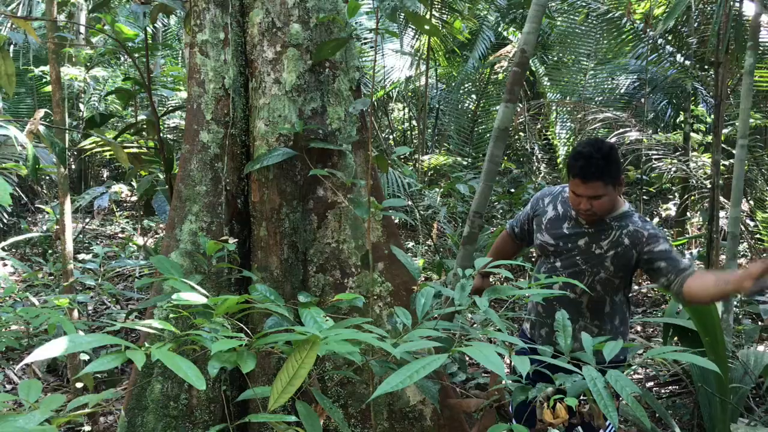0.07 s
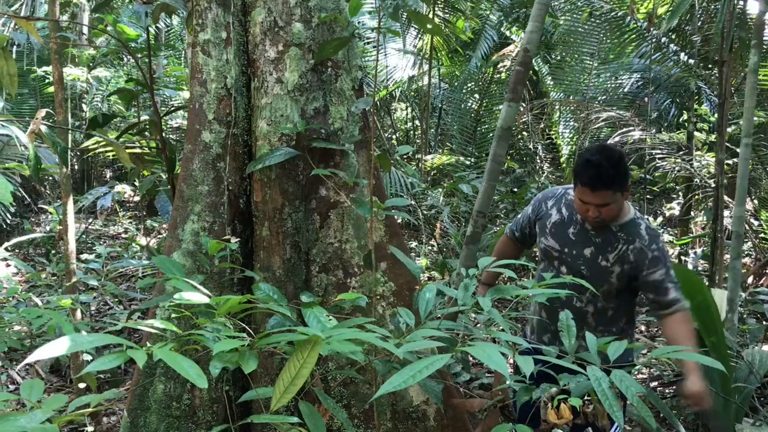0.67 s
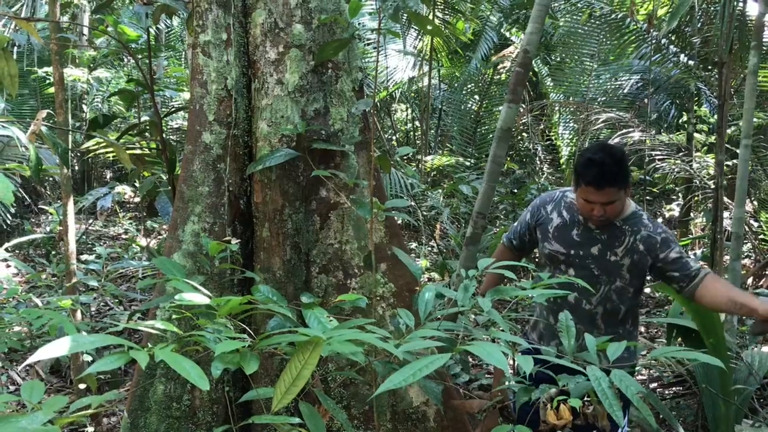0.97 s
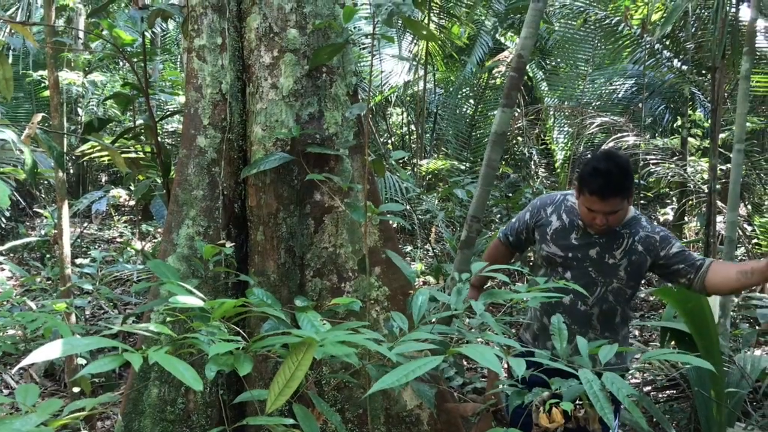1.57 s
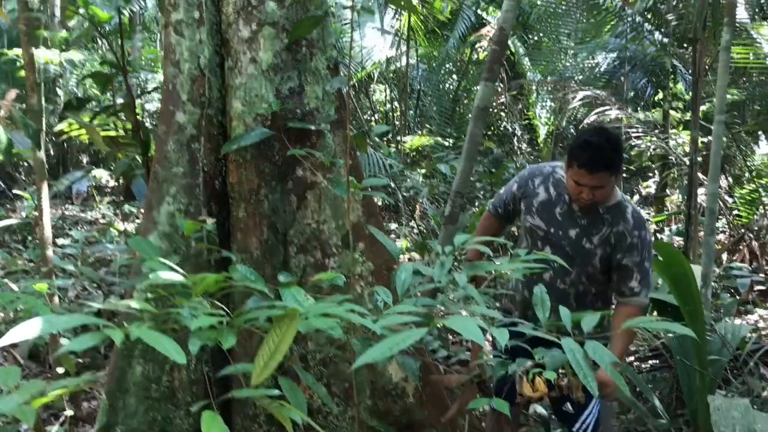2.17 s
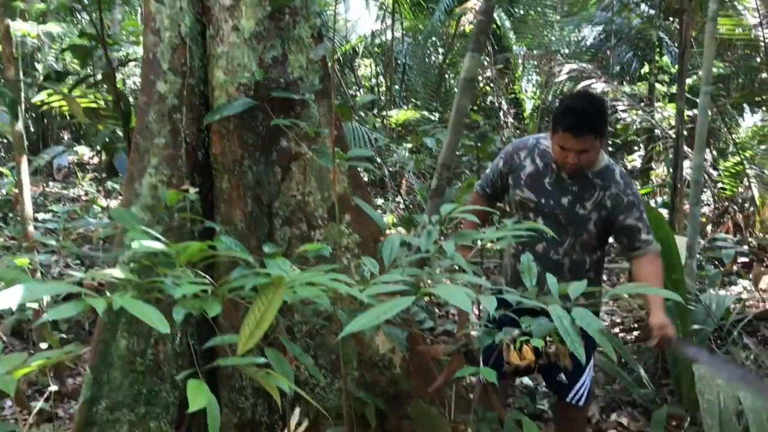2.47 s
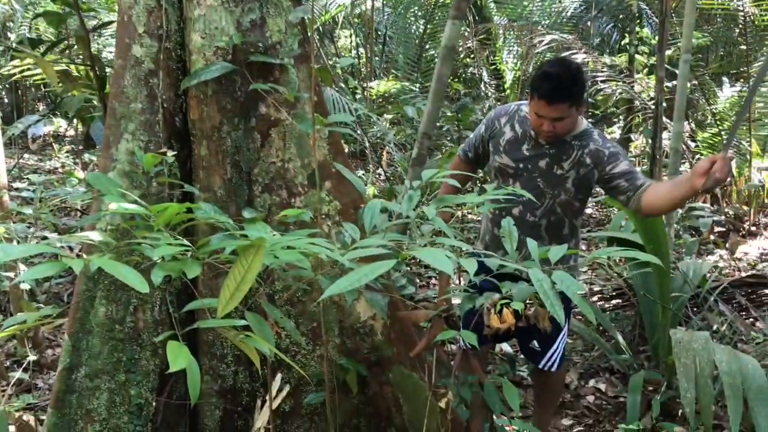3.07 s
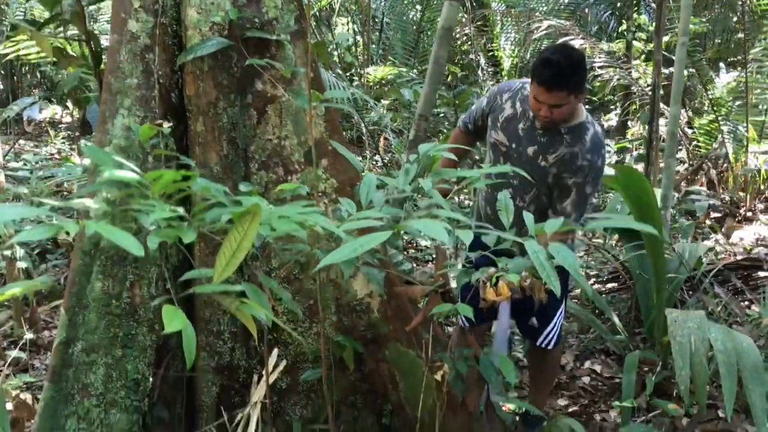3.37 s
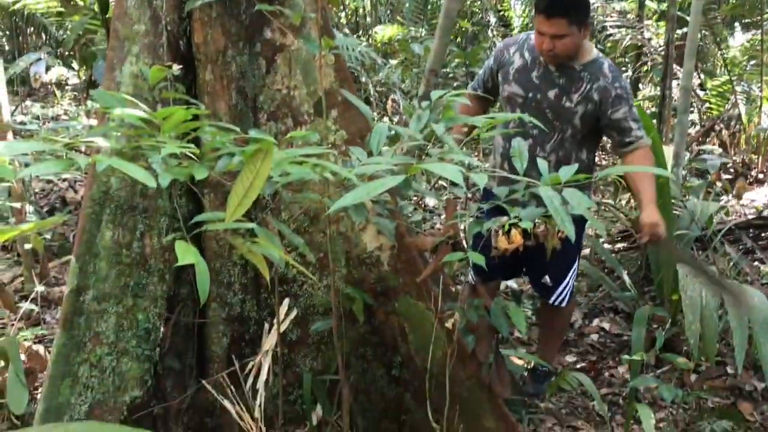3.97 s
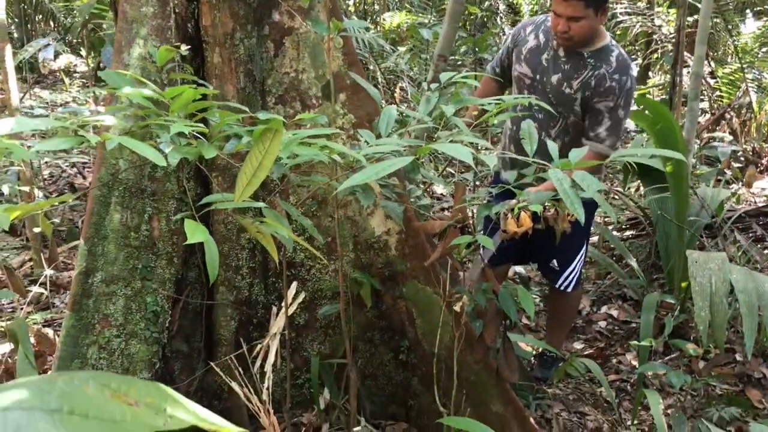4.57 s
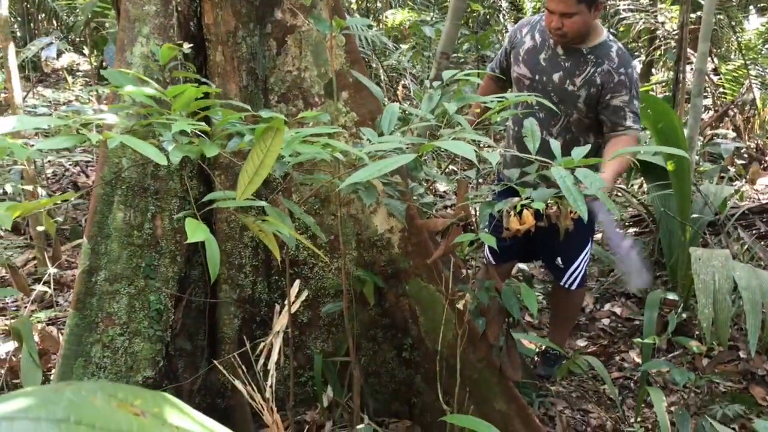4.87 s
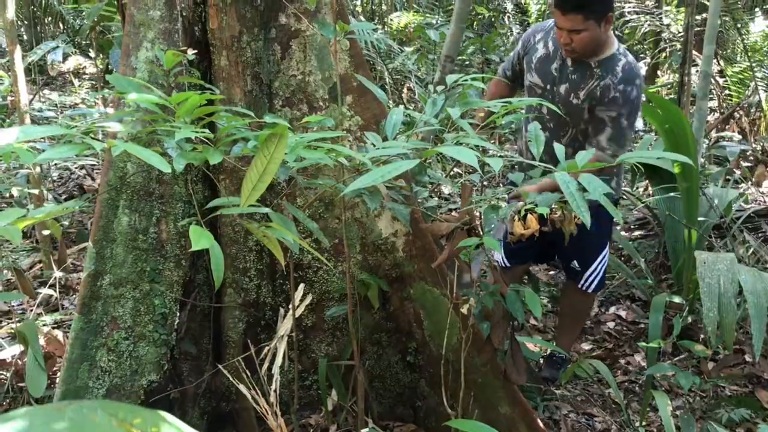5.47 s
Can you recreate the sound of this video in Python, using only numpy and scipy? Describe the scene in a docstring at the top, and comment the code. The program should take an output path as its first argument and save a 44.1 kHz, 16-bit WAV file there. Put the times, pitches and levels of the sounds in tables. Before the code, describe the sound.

Five loud machete chops on wood crack and echo through a forest, while crickets sing thinly in the background.

```python
"""A machete strikes the tall, flat root of a big rainforest tree five times.
The root booms like a plank, the bark cracks, the steel blade rings on as it swings back,
and the forest returns a long echo. Crickets and other insects sing, dry leaves tick, the air hums.
A limiter flattens each blow, and the volume dips briefly after it."""
import sys
import numpy as np
from scipy import signal
from scipy.fft import rfft, irfft
from scipy.io import wavfile
from scipy.ndimage import uniform_filter1d, minimum_filter1d

SR = 44100
rng = np.random.default_rng(int(sys.argv[2]) if len(sys.argv) > 2 else 0)


def wav_record(signal):
    """Record a signal, one row per channel, as 16-bit PCM in the file named by sys.argv[1]."""
    frames = np.transpose(np.atleast_2d(signal))
    bounded = np.clip(frames, -1, 1)
    # unit amplitude maps onto the largest positive 16-bit level
    quanta = np.round(bounded * 32767).astype(np.int16)
    wavfile.write(sys.argv[1], SR, quanta)


N = 242550
TIME = np.arange(N) / SR


# The blows: start_s, boom_db, root_spot (0 to 1), crack_db, brightness_db_per_octave, ring_db,
# blade_point (share of its length), looseness (a loose grip rings longer), swell_db
BLOWS = [(0.3954, -0.5, 0.05, 1, 1, -32.5, 0.32, 1.09, -27.5),
         (2.0314, 0, 0.1, -0.5, 2.5, -25.5, .445, 0.83, -35),
         (3.4105, -2, 0.2, 0.5, 0.5, -31, 0.24, 0.69, -27.5),
         (4.5906, -0.5, 0.76, 4.5, -0.5, -30.5, 0.066, 0.89, -43.5),
         (5.463, 0, 0.86, 5, -1.5, -33, .06, 1, -42.5)]
# Soft second thuds of the root: start_s, level_db
REBOUNDS = [(2.105, -28), (4.665, -25.5)]

def machete_blows(rebound_spot=0.6):
    """Each blow sounds the root, the bark, the blade and the forest."""
    out = np.zeros(N)
    for start_s, db, spot, crack_db, brightness, ring_db, point, looseness, swell_db in BLOWS:
        swell = low_swell()
        add(out, start_s - len(swell) / SR, amp(swell_db) * swell)
        add(out, start_s, amp(db + 1) * root_boom(spot))
        add(out, start_s, amp(db) * root_thump())
        add(out, start_s, amp(crack_db) * bark_crack(brightness))
        add(out, start_s, amp(ring_db) * blade_ring(point, looseness))
        add(out, start_s, amp(ring_db) * blade_clang())
        add(out, start_s, amp(db) * forest_echo())
    for start_s, db in REBOUNDS:
        add(out, start_s, amp(db) * root_boom(rebound_spot))
    return out


# The tones of the bending root: pitch_hz, level_at_spot_0_db, level_at_spot_1_db, decay_s
# (a decay is the time a sound takes to fall by 60 dB)
ROOT_TONES = [(113, 0, -2, 0.1), (151.1, -1, -0.5, 0.091), (180.6, -8, -8.5, 0.15),
              (221.6, -6.5, -1, 0.085), (256, -9, -1, 0.097), (330, -6.5, -9, 0.069),
              (348.6, -45.5, -18.5, 0.031), (379.6, -11.5, -15, 0.1), (437, -8.5, -5, 0.047),
              (509.6, 4, 0, 0.039), (538.6, 2, -1.5, 0.042), (638.5, -16, -14, 0.075),
              (821, -22, -29, 0.14), (897, -27, -40, 0.18), (960, -12.5, -11, 0.033),
              (1164, -18.5, -16.5, .055), (1364, -29, -14, 0.0091), (1530, -24, -16, 0.066),
              (1877, -33, -20, 0.038), (2556, -42.5, -7, 0.015), (2616, -16.5, -28.5, 0.041),
              (3040, -74.5, -17.5, 0.058)]

def root_boom(spot, lag_s=0.00554, corner_hz=260):
    """The root bends and rings; its low waves travel slowly and so arrive last."""
    t = TIME[:SR // 2]
    ring = np.zeros(len(t))
    for k, (hz, db0, db1, decay_s) in enumerate(ROOT_TONES):
        level = amp(db0 + spot * (db1 - db0) - 60 * t / decay_s)
        ring += (-1) ** k * level * np.sin(2 * np.pi * hz * t)  # every other tone is flipped
    hz = np.fft.rfftfreq(SR, 1 / SR)
    delay_lows = np.exp(-2j * np.pi * lag_s * corner_hz * np.arctan(hz / corner_hz))
    return irfft(rfft(ring, SR) * delay_lows, SR)[:len(t)]


def root_thump(db=-14, hz=72, decay_s=0.1, rise_s=0.0067):
    """The whole root heaves slowly under the blow."""
    t = TIME[:SR // 3]
    rise = 1 - np.exp(-(t / rise_s) ** 2)
    return amp(db - 60 * t / decay_s) * rise * np.sin(2 * np.pi * hz * t)


# The tone colour of cracking bark: pitch_hz, level_db
CRACK_COLOUR = [(200, -34), (700, -5.5), (1500, 8), (3300, -1), (5500, -4.5), (8500, -6), (12000, -12),
                (15500, -32)]

def bark_crack(brightness, click_hz=5700, click_s=0.0023, snap_s=0.0045, crush_s=0.042):
    """The edge clicks on contact, snaps the bark and briefly crushes it."""
    t = TIME[:SR // 8]
    colour = [(hz, db + brightness * np.log2(hz)) for hz, db in CRACK_COLOUR]
    click = amp(1 + 2 * brightness - 60 * t / click_s) * np.sin(2 * np.pi * click_hz * t)
    snap = amp(-5 - 60 * t / snap_s)
    crush = amp(-16 - 60 * t / crush_s)
    return click + noise(colour, len(t)) * (snap + crush)


# The blade's overtones, from the seventh up: pitch_hz, level_db, decay_s
BLADE_TONES = [(4200, 0, .8), (4828, -4, .72), (5412, -3, .66), (5955, -2, .62), (6498, -5, .54),
               (7036, -16, .45), (7562, -18, .38)]

def blade_ring(point, looseness, shimmer=0.42, shimmer_hz=50, rise_s=0.0036):
    """The steel rings as it leaves the wood; tones that barely move the struck point stay quiet."""
    t = TIME[:SR]
    pitch_bend = 0.006 * t / 0.14 * np.exp(1 - t / 0.14)  # from the backswing
    clock = np.cumsum(1 + pitch_bend) / SR
    out = np.zeros(SR)
    for n, (hz, db, decay_s) in enumerate(BLADE_TONES, 7):
        strength = np.sqrt(np.cos(np.pi * n * point) ** 2 + 0.018)
        level = strength * amp(db - 60 * t / (decay_s * looseness))
        reflections = shimmer * (drift(shimmer_hz, SR) + 1j * drift(shimmer_hz, SR))
        out += level * ((1 + reflections) * np.exp(2j * np.pi * hz * clock)).imag
    return out * (1 - np.exp(-t / rise_s))


# The blade's crowded, short-lived tones: pitch_hz, level_db
CLANG_COLOUR = [(1500, -22.5), (3500, -5), (4800, -1.5), (6300, -4.5), (8000, -8.5), (12000, -17.5),
                (15500, -22)]
# How long they last: pitch_hz, decay_s
CLANG_DECAY = [(4000, 0.12), (7000, 0.15), (14000, 0.15)]

def blade_clang(db=10, rise_s=0.012):
    """The steel rattles briefly while the blade bites."""
    t = TIME[:SR // 3]
    rise = 1 - np.exp(-(t / rise_s) ** 2)
    return amp(db) * rise * dying_noise(CLANG_COLOUR, CLANG_DECAY, len(t))


# Clicks ahead of the blows: start_s, level_db, decay_s
EARLY_CLICKS = [(.3846, -8, 0.0065), (.3865, -20.5, 0.07), (.3925, -18, 0.014), (2.0085, -43, .012),
                (2.021, -30, 0.007), (2.0295, -30, 0.01)]
# Their tone colour: pitch_hz, level_db
CLICK_COLOUR = [(200, -25.5), (800, 1.5), (2500, 2), (5500, 6), (9000, 1.5), (15500, -4.5)]

def early_clicks():
    """Faint clicks and scratches come just before the first two blows."""
    return scratches(EARLY_CLICKS, CLICK_COLOUR)


def low_swell(band_hz=(290, 510), length_s=0.022):
    """A faint, low rush swells just before each blow."""
    size = round(length_s * SR)
    band = signal.butter(2, band_hz, "bandpass", fs=SR, output="sos")
    rush = unit(signal.sosfilt(band, rng.standard_normal(SR // 4))[-size:])
    return rush * np.linspace(0, 1, size) * signal.windows.tukey(size, 0.15)


# The tone colours of the near and far echoes: pitch_hz, level_db
NEAR_COLOUR = [(100, -10), (400, -1.5), (1000, 10), (2000, 7), (3400, 3.5), (5500, -20.5), (7500, -7.5),
               (10000, -10), (12000, -6.5), (15500, -32.5)]
FAR_COLOUR = [(50, -14), (140, 11.5), (280, 1), (500, 3.5), (1000, -1), (1800, -6), (3500, -1.5),
              (7000, -4), (15000, -35)]
# How long they last: pitch_hz, decay_s
NEAR_DECAY = [(200, 0.28), (1000, 0.3), (5000, 0.19), (14000, 0.32)]
FAR_DECAY = [(140, 0.99), (500, 1.64), (1200, 1.48), (3500, 0.66), (10000, 0.59)]

def forest_echo(near_db=-25, near_delay_s=0.0038, far_db=-37.5, far_rise_s=0.014, trunk_s=0.2395):
    """Ground and leaves scatter the blow at once; far trunks keep returning it, one of them louder."""
    t = TIME[:2 * SR]
    near_level = amp(near_db) / (1 + np.exp((near_delay_s - t) / 0.0028))
    near = near_level * dying_noise(NEAR_COLOUR, NEAR_DECAY, len(t))
    trunk_db = 5 * np.exp(-((t - trunk_s) / 0.019) ** 2)
    far_level = amp(far_db + trunk_db) * (1 - np.exp(-t / far_rise_s))
    return near + far_level * dying_noise(FAR_COLOUR, FAR_DECAY, len(t))


# The nearest cricket's calls: peak_s, level_db
CRICKET_CALLS = [(.17, -50), (0.661, -57), (1.272, -41.5), (1.85, -44), (2.48, -49.5), (3.07, -44),
                 (3.68, -68), (4.208, -43.5), (4.799, -47.5), (5.29, -46)]
# The crickets' voice: pitch_hz, width_hz, level_db
CRICKET_VOICE = [(2975, 49, -5), (3065, 15, -9.5)]

def crickets(rise_s=0.056, decay_s=1, chorus_db=-55):
    """One cricket's calls swell and die away among the trees, over a steady chorus of its kind."""
    power = amp(chorus_db) ** 2
    for peak_s, db in CRICKET_CALLS:
        swell = np.exp(-(np.minimum(TIME - peak_s, 0) / rise_s) ** 2)
        fade = amp(db - 60 * np.maximum(TIME - peak_s, 0) / decay_s)
        power += (swell * fade) ** 2
    return np.sqrt(power) * sum(amp(db) * buzz(hz, width) for hz, width, db in CRICKET_VOICE)


# The voices of distant insects: pitch_hz, width_hz, level_db
DRONE_VOICES = [(2860, 168, -60), (3096, 560, -59), (3397, 130, -67), (5830, 540, -68), (8810, 940, -70.5),
                (2350, 690, -65.5)]

def insect_drone(start_db=-2, growth_db_per_s=0.5):
    """Distant insects blend into a drone that slowly grows louder."""
    voices = sum(amp(db) * buzz(hz, width) for hz, width, db in DRONE_VOICES)
    return amp(start_db + growth_db_per_s * TIME) * voices


# One insect's whistles: start_s, level_db
WHISTLES = [(.74, -56), (1.46, -54.5), (3.0, -55.5), (4.2, -53), (4.9, -52.5)]

def insect_whistles(hz=3475, fall_hz=170, length_s=0.35):
    """An insect whistles a falling note, blurred by its many paths through the trees."""
    out = np.zeros(N)
    progress = np.linspace(0, 1, round(length_s * SR))
    tone = np.exp(2j * np.pi * np.cumsum(hz - fall_hz * progress) / SR)
    swell = np.sqrt(abs(np.sin(np.pi * progress)) / 2)
    for start_s, db in WHISTLES:
        blur = (drift(35.4, SR) + 1j * drift(35, SR))[:len(tone)]
        add(out, start_s, amp(db) * swell * (tone * blur).imag)
    return out


def insect_chirps(db=-68, hz=9120, first_s=0.2, every_s=0.329, length_s=0.2, uneven_db=2):
    """Another insect repeats a short, high chirp."""
    pulses = np.zeros(N)
    swell = np.hanning(round(length_s * SR))
    for peak_s in np.arange(first_s, N / SR, every_s):
        add(pulses, peak_s - length_s / 2, amp(uneven_db * rng.standard_normal()) * swell)
    return amp(db) * pulses * buzz(hz, width_hz=496)


# The loudest ticks of leaves and twigs: start_s, level_db
LEAF_TICKS = [(0.696, -43.5), (1.202, -49), (1.2923, -48.5), (1.684, -49), (2.4686, -51), (2.516, -47),
              (2.8769, -40), (3.3186, -43.5), (4.5526, -42.5), (5.295, -48)]
# Their tone colour: pitch_hz, level_db
LEAF_COLOUR = [(200, -40.5), (1200, 13.5), (2200, -7.5), (4500, 5.5), (8000, -2.5), (12000, -1.5),
               (15500, -13)]

def leaf_ticks(decay_s=0.04, faint_per_s=4.2, faint_db=(-58, -52)):
    """Dry leaves give a few clear ticks, and fainter ones at random."""
    count = round(faint_per_s * N / SR)
    faint = [(rng.uniform(0, N / SR), rng.uniform(*faint_db)) for _ in range(count)]
    return scratches([(start_s, db, decay_s) for start_s, db in LEAF_TICKS + faint], LEAF_COLOUR)


# The tone colour of the forest air: pitch_hz, level_db
AIR_COLOUR = [(25, -14), (70, 4.5), (150, 4.5), (250, 3), (500, 0.5), (1000, -3.5), (1800, -7), (4300, -7),
              (7500, -13), (12000, -15.5), (15500, -21.5)]

def forest_air(db=-57, hum_hz=148, hum_db=-67, throb_db=3):
    """A soft, steady hush, with a low hum that comes and goes."""
    hush = amp(db) * noise(AIR_COLOUR)
    return hush + amp(hum_db + throb_db * drift(2.7)) * buzz(hum_hz, width_hz=25)


def scratches(bursts, colour):
    """Short, dry bursts of noise."""
    out, t = np.zeros(N), TIME[:SR // 10]
    for start_s, db, decay_s in bursts:
        add(out, start_s, amp(db - 60 * t / decay_s) * noise(colour, len(t)))
    return out


def noise(colour, size=N):
    """Noise with the given tone colour."""
    hz = np.fft.rfftfreq(size, 1 / SR)
    return unit(irfft(rfft(rng.standard_normal(size)) * amp(look_up(colour, hz)), size))


def dying_noise(colour, decays, size):
    """Noise in which each pitch dies away at its own speed."""
    hz, t, bands = signal.stft(noise(colour, size), SR, nperseg=256)
    fade = amp(-60 * t / look_up(decays, hz)[:, None])
    return signal.istft(bands * fade, SR, nperseg=256)[1][:size]


def buzz(pitch_hz, width_hz):
    """A fuzzy tone, like many small singers around one pitch."""
    distance = (np.fft.rfftfreq(N, 1 / SR) - pitch_hz) / (width_hz / 2)
    return unit(irfft(rfft(rng.standard_normal(N)) / (1 + distance ** 2), N))


def drift(rate_hz, size=N):
    """A slow, random wobble."""
    hz = np.fft.rfftfreq(size, 1 / SR)
    return unit(irfft(rfft(rng.standard_normal(size)) * np.exp(-(hz / rate_hz) ** 2), size))


def amp(db):
    """Turn decibels into a multiplier."""
    return 10 ** (np.asarray(db) / 20)


def unit(x):
    """Scale a sound to an average (rms) level of 1."""
    return x / np.sqrt(np.mean(x ** 2) + 1e-20)


def look_up(table, hz):
    """Read a table between its listed pitches."""
    pitches, values = np.transpose(table)
    return np.interp(np.log(hz + 1), np.log(pitches + 1), values)


def add(mix, start_s, sound):
    """Mix a sound in at the given time."""
    part = mix[max(round(start_s * SR), 0):][:len(sound)]
    part += sound[:len(part)]


def scene():
    """The blows over the life of the forest."""
    chops = amp(7) * (machete_blows() + early_clicks())
    insects = crickets() + insect_drone() + insect_whistles() + insect_chirps()
    return (chops + insects + forest_air() + leaf_ticks())[None]


def volume_dip(x, threshold_db=-14, depth_db=7, hold_s=0.11, recovery_db_per_s=45):
    """A loud sound turns the volume down at once; it holds, then comes back."""
    over_db = np.clip(20 * np.log10(abs(x).max(0) + 1e-9) - threshold_db, 0, depth_db)
    recovery_db = recovery_db_per_s * TIME
    dip_db = np.maximum.accumulate(over_db + recovery_db) - recovery_db
    hold = round(hold_s * SR)
    return x * amp(minimum_filter1d(-dip_db, size=hold, origin=(hold - 1) // 2))


def record(dry, start_s=0.12, fade_s=0.062, ceiling=0.97, top_hz=15900):
    """Fade in, dip after loud sounds, flatten the peaks and cut the highest treble."""
    x = volume_dip(dry * np.clip((TIME - start_s) / fade_s, 0, 1))
    safe_gain = ceiling / np.maximum(abs(x), ceiling)
    limited = x * uniform_filter1d(minimum_filter1d(safe_gain, size=40), size=40)
    treble_cut = signal.firwin(301, top_hz, window=("kaiser", 9), fs=SR)
    return signal.oaconvolve(limited, treble_cut[None], "same")


dry = scene()
out = record(dry)
wav_record(out)
```